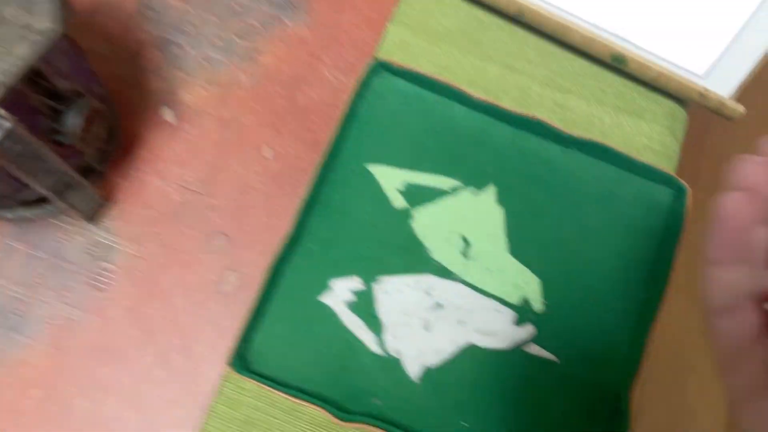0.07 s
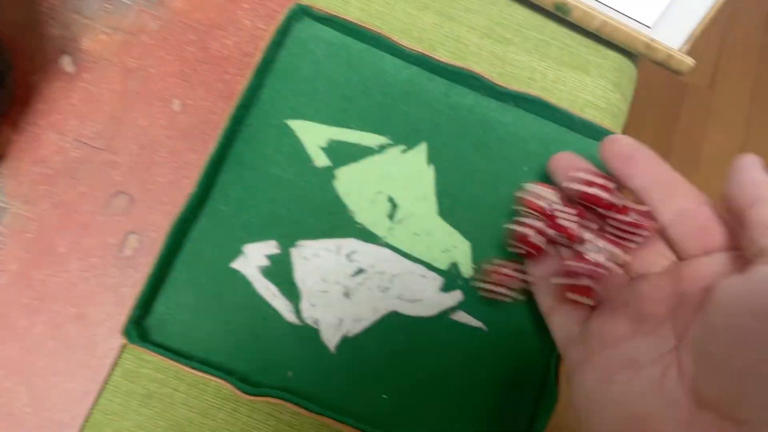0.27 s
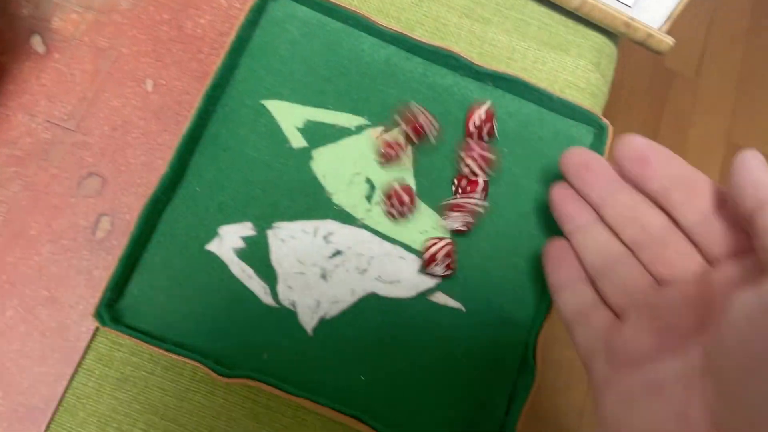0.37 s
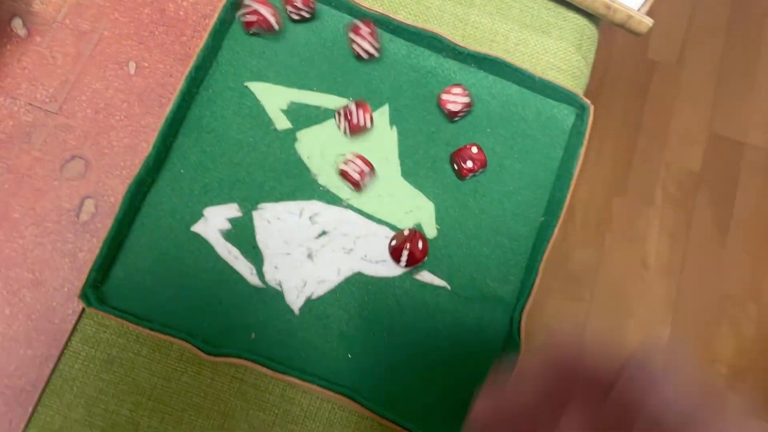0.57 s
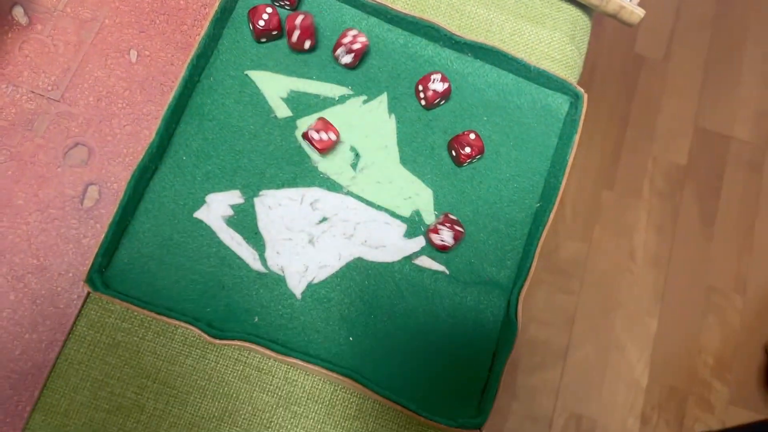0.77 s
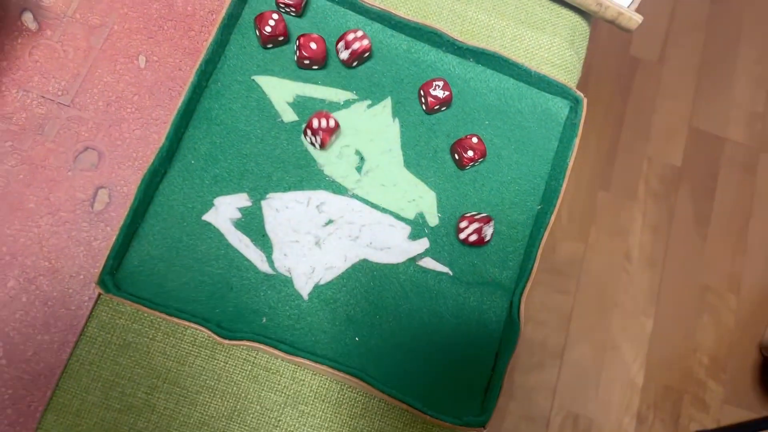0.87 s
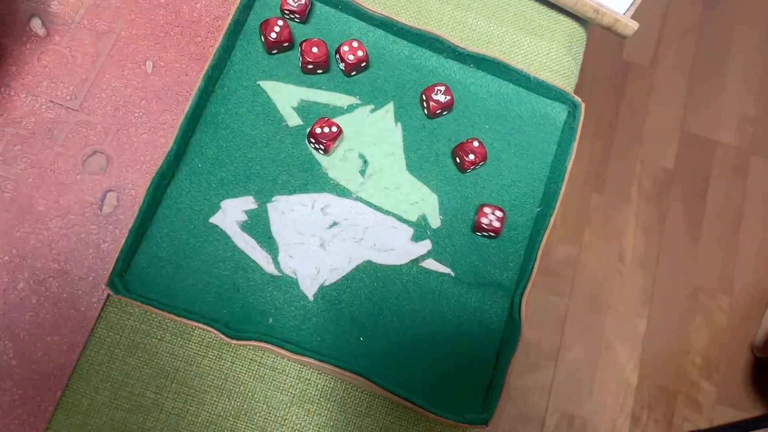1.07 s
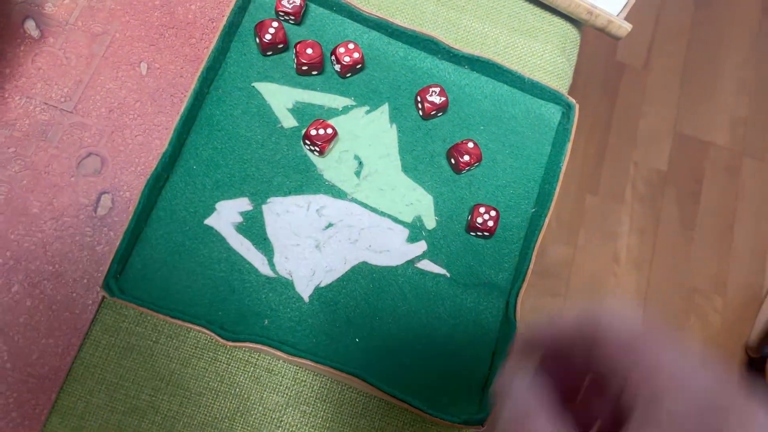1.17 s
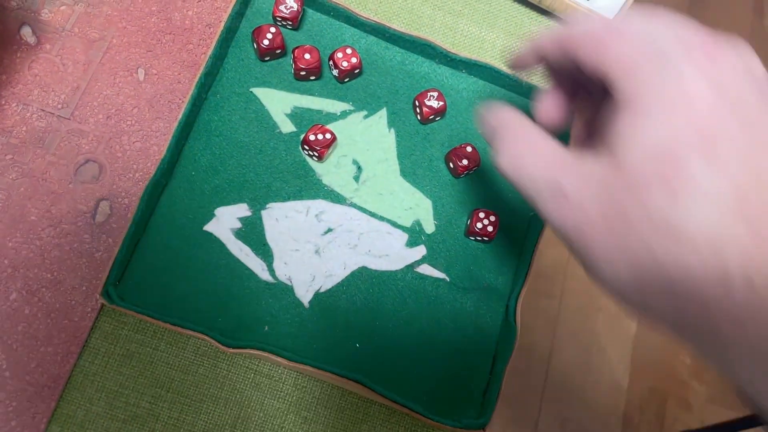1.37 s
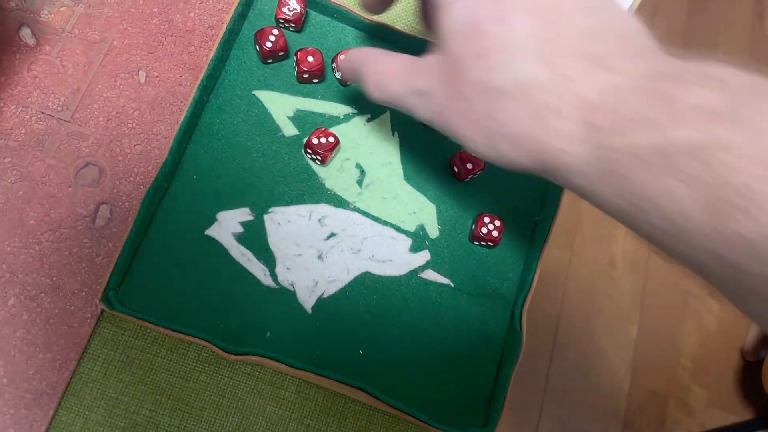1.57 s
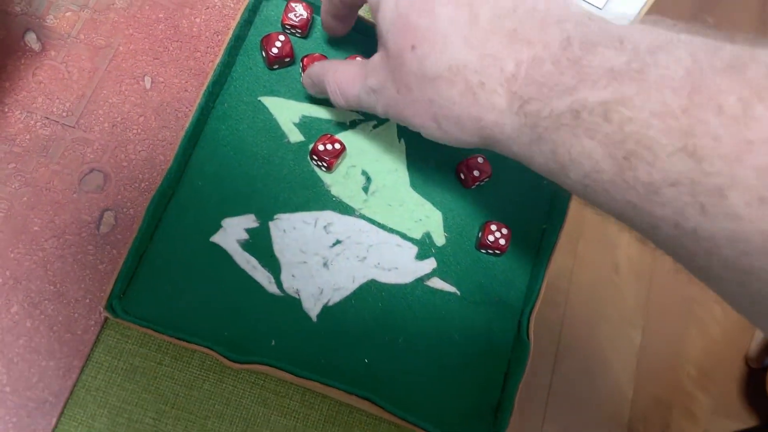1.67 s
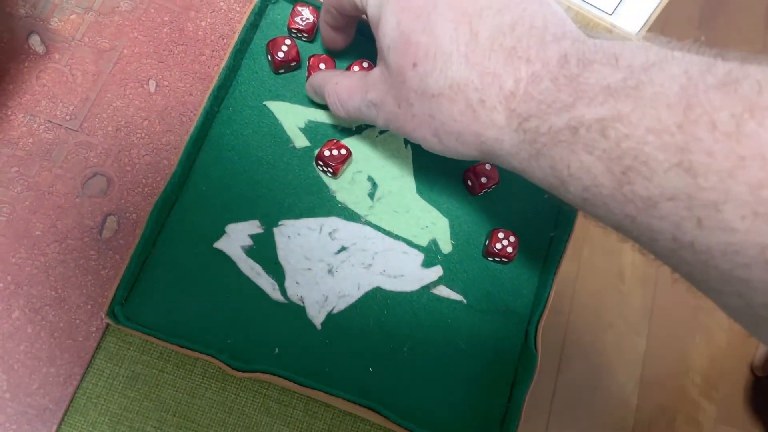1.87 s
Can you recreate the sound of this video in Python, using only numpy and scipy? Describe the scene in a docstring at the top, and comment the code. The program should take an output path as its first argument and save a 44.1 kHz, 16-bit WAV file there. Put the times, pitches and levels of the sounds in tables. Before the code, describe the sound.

A handful of dice thrown into a felt tray, followed by two faint wooden bumps.

```python
"""A sleeve rustles and dice clack in a cupped hand, each clack a bright tick over a hollow ring.
From 0.3 s they land in a felt-lined tray: it knocks, the board below booms, the dice hit each other.
They patter over the felt; the last tips flat at 0.86 s. At 1.1 s and 1.6 s something wooden is bumped
farther off, the first time after a scrape. A quiet room hum lies under it all."""
import sys
import numpy as np
from scipy import signal
from scipy.fft import rfft, irfft, next_fast_len
from scipy.io import wavfile

SR = 44100
rng = np.random.default_rng(int(sys.argv[2]) if len(sys.argv) > 2 else 0)


def dump_mix(stems):
    """Bounce the given channels to the path in sys.argv[1] as a 16-bit WAV at rate SR."""
    frames = np.atleast_2d(stems).T  # one column per channel
    limited = np.clip(frames, -1, 1)  # hard clip at full scale
    pcm = np.round(limited * 32767).astype(np.int16)
    wavfile.write(sys.argv[1], SR, pcm)


N = 83790

# modes of a die on felt: pitch_hz, level_db, t60_s
FELT_MODES = [(1250, -4, .015), (1670, 0, .025), (2150, -7, .015), (2850, -8, .015)]


def dice_clacks():
    """A touch and three fainter ones excite a bright, short ring and the hollow of the hand."""
    # clacks; a faint tail follows the first at 0.107-0.124 s: start_s, level_db, hollow_over_tick_db
    clacks = [(0.0954, -35.0, 5), (0.107, -41, 9.5), (0.1145, -51.5, 16), (0.1186, -48.5, 18),
              (0.124, -50.5, 3.5), (0.1698, -20.5, 14.5), (0.173, -33.5, 13), (0.178, -25.5, -3.5),
              (0.1813, -31.5, 6.5), (0.1844, -24.5, 10.5), (0.1886, -28, 4), (0.194, -34, 11.5),
              (0.1982, -31, 8.5), (0.201, -10.5, 21), (0.206, -11, 17), (0.2097, -10, 4), (0.2155, -26, 7),
              (0.2215, -18.5, 0.5), (0.2239, -11, 13.5), (0.2312, -24, -6.5), (0.2442, -8.5, 12.5),
              (0.2552, -15, -6), (0.2583, -29.5, -8), (0.2619, -34.5, 2), (0.2739, -34.5, -10),
              (0.3163, -22, 9), (0.3194, -17.5, -3), (0.323, -29, 0), (0.3334, -10, 0.5), (0.3384, -24, 1),
              (0.3427, -4, -24), (0.3443, 2, -16.5), (0.3537, -18.5, -15.5), (0.3585, -23.5, 2),
              (0.365, -13, -13), (0.368, -25, -0.5), (0.3871, -11, -1), (0.3945, -7, -8.5),
              (0.3967, -13.5, -15), (0.4074, -27, -13), (0.4214, -30.5, -5), (0.432, -34.5, -9.5),
              (0.5316, -16.5, -5), (0.5968, -19.5, 2.5), (0.6630, -21.5, 9.5), (0.6804, -23, -2),
              (0.6848, -14, -35), (0.7899, -40, 9), (0.8835, -56, 20.5)]
    hollow_modes = [(1800, -12), (2600, -9.5), (3600, -9.5), (4400, -3.5), (5300, -1)]  # cupped hollow: pitch_hz, level_db
    tick_modes = [(6200, 5.5), (7200, 6.5), (8300, 6), (9600, 4), (11200, -3.5), (12800, -10.5)]  # bright, short ring: pitch_hz, level_db
    chatter_s, chatter_db = 0.0033, -13
    hollow_t60_s, tick_t60_s = 0.0045, 0.0028
    throw_s, open_db_per_oct = 0.3, -0.5
    start_s, level_db, hollow_db = np.repeat(clacks, 4, axis=0).T
    lateness = (rng.random((len(clacks), 4)) * [0, 1, 1, 1]).ravel()
    start_s = start_s + chatter_s * lateness
    level_db = level_db + chatter_db * (1 + lateness) * (lateness > 0)
    tick_db = level_db - 10 * np.log10(1 + 10 ** (hollow_db / 10))  # tick and hollow share the power

    def hollow_mode_db(hz):
        """Out of the hand, the lower modes gain slightly on the top one."""
        tilt_db = open_db_per_oct * np.log2(hz / hollow_modes[-1][0])
        return tick_db + hollow_db + tilt_db * (start_s > throw_s)

    hollow = strike(start_s, hollow_mode_db, [(*mode, hollow_t60_s) for mode in hollow_modes])
    tick = strike(start_s, lambda hz: tick_db, [(*mode, tick_t60_s) for mode in tick_modes])
    return highpass(hollow + highpass(tick, 4500), 1490, order=4)


def tray_landings():
    """A landing knocks the tray, then the board below booms; the felt dulls both."""
    landings = [(0.3085, -18, -16.5, 9), (.315, -21, -43, 12.5), (0.321, -25.5, -32.5, 13.5),
                (0.328, -10, -28.5, 0), (.351, -23.5, -16, 15.5), (.357, -16, -34, 5),
                (.385, -22, -9.5, 12.5), (0.393, -25.5, -20, 11), (0.4, -22.5, -52, -23),
                (0.417, -23.5, -50.5, 5), (0.43, -22.5, -56.5, -7), (0.451, -18, -55, -8.5),
                (0.483, -33, -20, -2), (0.49, -28.5, -43, 6.5), (0.512, -36, -30.5, 18.5),
                (0.521, -30.5, -54, 10.5), (0.5639, -22, -18, 10), (0.619, -33, -52, -5),
                (0.644, -32.5, -49.5, -5), (0.673, -36, -43.5, 9), (0.695, -35, -60, -1),
                (0.727, -45, -53.5, 10), (0.749, -44.5, -51.5, 1), (0.925, -52, -71, -6),
                (.967, -58, -65, -27), (1.498, -87, -54, -2.5)]  # die on tray: start_s, boom_db, knock_db, upper_modes_db
    board_modes = [(54, -15.5, 0.2), (71.5, -0.5, 0.17), (132.6, -2.5, 0.24), (172.6, 2.5, 0.1),
                   (205.4, 2.5, 0.039), (264, 1.5, 0.036), (345, -12, 0.08), (467, -10.5, 0.037),
                   (616, -13.5, 0.055)]  # pitch_hz, level_db, t60_s
    knock_modes = [(830, -1.5, 0.0011), (1352, -9.5, 0.021), (1550, -10, 0.005)]  # pitch_hz, level_db, t60_s
    upper_from_hz, felt_hz = 230, 2100
    start_s, boom_db, knock_db, upper_db = np.transpose(landings)
    boom = strike(start_s, lambda hz: boom_db - 8 + upper_db * (hz > upper_from_hz), board_modes,
                  lag_at_250hz_s=0.0031, in_phase=True)
    knock = strike(start_s, lambda hz: knock_db + 3, knock_modes, in_phase=True)
    knock = lowpass(highpass(knock, 400), felt_hz)
    return lowpass(lowpass(boom, 900) + knock, felt_hz)


def dice_rolling():
    """Dense random touches on the felt ring the tumbling dice."""
    contour = [(.55, -47.5), (.63, -55), (.78, -54.5), (.87, -65), (.93, -100)]  # time_s, level_db
    touches_per_s = 2900
    patter = (rng.random(N) < touches_per_s / SR) * rng.standard_normal(N) + 1e-18
    roll = sum(from_db(db) * ring(patter, hz, t60_s) for hz, db, t60_s in FELT_MODES)
    return envelope(contour) * highpass(roll / roll.std(), 920)


def last_die():
    """The last die tips flat: one soft click in its upper modes."""
    top_hz = 3300
    click = clicks(start_s=[0.856], gains=from_db(-41))
    tip = sum(ring(click, hz, t60_s) for hz, _, t60_s in FELT_MODES[2:])
    return lowpass(lowpass(highpass(tip, 1800), top_hz), top_hz)


def far_bumps():
    """Distant wood scrapes, then blows crack, boom and ring on; a high hiss swells with both."""
    blows = [(1.121, -34.5, -35.5, 99, 546, -50.5, 2300), (1.1437, -51.5, -38, 176, 603, -81, 1510),
             (1.5845, -24.5, -33.5, 79.4, 376, -34.5, 9000), (1.602, -28, -29, 82.1, 404, -36, 9340),
             (1.634, -35, -35, 142.4, 442, -32, 1984), (1.684, -42, -57, 129, 460, -46.5, 2640)]  # start_s, knock_db, boom_db, boom_hz, body_hz, hiss_db, top_hz
    wood_modes = [(674, -8, 100), (956, -5, 88), (1122, -5, 162), (1390, -16, 750), (1684, -5, 295),
                  (2110, -4, 306), (3073, -10.5, 273), (3606, -6, 293), (4242, -29, 600), (5366, -19, 183)]  # pitch_hz, level_db, width_hz
    hiss_bands = [(4300, -1, 1200), (6600, 2, 600), (8040, 2.5, 1800), (9600, -7, 1000), (12450, 3, 4100),
                  (5310, 15, 110), (5740, 13, 100)]  # high hiss, two narrow singing bands: pitch_hz, level_db, width_hz
    scrape_contour = [(1.05, -60.5), (1.085, -49), (1.12, -35), (1.13, -71)]  # time_s, level_db
    correlation, body_width_hz = -0.28, 147
    noise = rng.standard_normal((2, N))
    noise[1] = correlation * noise[0] + np.sqrt(1 - correlation ** 2) * noise[1]
    scrape = envelope(scrape_contour)
    drive = lowpass(scrape * noise, 1850)
    hiss_gain = from_db(-21) * scrape
    out = 0
    for start_s, knock_db, boom_db, boom_hz, body_hz, hiss_db, top_hz in blows:
        tail = from_db(knock_db) * fade(start_s, t60_s=0.31)
        crack = from_db(knock_db + 15.5) * fade(start_s, t60_s=0.012, rise_s=0.0005)
        drive = drive + lowpass(tail * noise, top_hz) + lowpass(crack * noise, 2 * top_hz)
        body = bandpass((tail + crack) * noise[0], body_hz, body_width_hz)
        out += from_db(9) * bandpass(body, body_hz, 2 * body_width_hz)
        thump = clicks([start_s + 0.0015], gains=45) + fade(start_s, t60_s=0.28) * noise[0]
        out += from_db(boom_db + 17) * lowpass(bandpass(thump, boom_hz, width_hz=29), 400)
        hiss_gain += from_db(hiss_db) * fade(start_s, t60_s=0.23, rise_s=0.018)
    for k, (hz, db, width_hz) in enumerate(wood_modes):
        mode = bandpass(bandpass(drive, hz, width_hz), hz, width_hz)
        out = out + (-1) ** k * from_db(db + 13.5) * mode
    flat_noise = diffuse_noise(np.ones_like)
    hiss = sum(from_db(db) * bandpass(flat_noise, hz, width_hz) for hz, db, width_hz in hiss_bands)
    hiss = highpass(hiss, 1800)
    return out + hiss_gain * hiss / hiss.std()


def sleeve_rustle():
    """Cloth noise during the shake and again before the second bump."""
    contour = [(0, -59.5), (.15, -67.5), (.3, -78.5), (1.39, -90), (1.41, -65.5), (1.46, -73.5),
               (1.57, -81)]  # time_s, level_db
    spectrum = [(200, -3.5), (1200, -1.5), (2500, -1), (5000, -32.5), (9000, -24.5)]  # freq_hz, density_db
    return envelope(contour) * steady_noise(spectrum)


def room_reverb(x):
    """One hard echo and a tail that dies band by band."""
    bands = [(108, -15, 0.55), (423, -15.5, 0.2), (1496, -11.5, 0.37), (3970, -12, 0.33), (8500, -24, 0.3),
             (14480, -14, 0.15)]  # tail: freq_hz, level_db, t60_s
    echo_s, echo_db = 0.0071, -22

    def band_gain(hz):
        decay = fade(start_s=0.0022, t60_s=at_hz(bands, hz, col=2), rise_s=0.0013)
        return from_db(at_hz(bands, hz) - 25.5) * decay

    response = diffuse_noise(band_gain)
    response[:, int(echo_s * SR)] += from_db(echo_db)
    size = next_fast_len(2 * N)
    return irfft(rfft(x, size) * rfft(response, size), size)[:, :N]


def room_hum():
    """Steady broad noise and a low rumble that dips at 1.3 s; a soft low bump sounds near the end."""
    hum_spectrum = [(300, -30.5), (815, -39), (3070, -46.5), (9000, -45), (12800, -43), (15000, -52)]  # freq_hz, density_db
    rumble_spectrum = [(40, 5), (120, -1), (300, -15), (600, -50)]  # freq_hz, density_db
    rumble_contour = [(0, -62), (1.27, -61), (1.32, -77), (1.783, -57), (1.819, -61), (1.859, -80)]  # time_s, level_db
    hum = from_db(-71) * steady_noise(hum_spectrum)
    held_to_end = rumble_contour + [(N / SR, rumble_contour[-1][1])]
    return hum + envelope(held_to_end) * steady_noise(rumble_spectrum)


def strike(start_s, blow_db, modes, lag_at_250hz_s=0, in_phase=False):
    """Blows ring modes at blow_db(hz); low modes lag most; signs alternate unless in_phase."""
    spread_db = 1.5 * rng.standard_normal((len(start_s), len(modes)))
    out = 0
    for k, (hz, db, t60_s) in enumerate(modes):
        sign = 1 if in_phase else (-1) ** k
        gains = sign * from_db(blow_db(hz) + db + spread_db[:, k])
        arrival_s = start_s + lag_at_250hz_s * np.sqrt(250 / hz)
        out += ring(clicks(arrival_s, gains), hz, t60_s)
    return out


def clicks(start_s, gains):
    out = np.full(N, 1e-18)
    np.add.at(out, (np.asarray(start_s) * SR).astype(int), gains)
    return out


def ring(x, hz, t60_s):
    """A unit click starts a decaying unit sine."""
    r, w = from_db(-60 / (t60_s * SR)), 2 * np.pi * hz / SR
    return signal.lfilter([0, np.sin(w)], [1, -2 * r * np.cos(w), r * r], x)


def diffuse_noise(gain):
    """Stereo noise in half-octave bands; gain(hz) may vary in time."""
    likeness = [(100, .95), (400, 1), (1500, 0), (6000, 0.41), (8500, 0.93), (14000, 0.8)]  # left to right in diffuse sound: freq_hz, correlation
    edges_hz = 30 * 2 ** np.arange(0, 9.1, 0.5)
    out, white = 0, rng.standard_normal((2, 2, N))
    for k, (low_hz, high_hz) in enumerate(zip(edges_hz, edges_hz[1:])):
        band = signal.butter(2, [low_hz, high_hz], "band", fs=SR, output="sos")
        mid, side = signal.sosfilt(band, white[k % 2])
        hz = np.sqrt(low_hz * high_hz)
        correlation = at_hz(likeness, hz)
        stereo = np.sqrt(1 + correlation) * mid + np.sqrt(1 - correlation) * side * [[1], [-1]]
        out += gain(hz) * stereo
    return out


def steady_noise(spectrum):
    x = diffuse_noise(lambda hz: from_db(at_hz(spectrum, hz)))
    return x / x.std()


def envelope(contour):
    """Gain from time_s, level_db rows; silent outside them."""
    time_s, level_db = np.transpose(contour)
    return from_db(np.interp(np.arange(N) / SR, time_s, level_db, -200, -200))


def fade(start_s, t60_s, rise_s=0.0003):
    """Rise, then fall ever faster; t60_s sets the initial slope."""
    steepen_db_per_s2 = 246.5
    t = np.maximum(np.arange(N) / SR - start_s, 0)
    return (1 - np.exp(-t / rise_s)) * from_db(-60 * t / t60_s - steepen_db_per_s2 * t * t)


def from_db(db):
    return 10 ** (np.asarray(db) / 20)


def at_hz(rows, hz, col=1):
    columns = np.transpose(rows)
    return np.interp(np.log(hz), np.log(columns[0]), columns[col])


def bandpass(x, hz, width_hz):
    r, w = np.exp(-np.pi * width_hz / SR), 2 * np.pi * hz / SR
    gain = (1 - r * r) / 2
    return signal.lfilter([gain, 0, -gain], [1, -2 * r * np.cos(w), r * r], x)


def lowpass(x, hz, order=2):
    return signal.sosfilt(signal.butter(order, min(hz, 18000), fs=SR, output="sos"), x)


def highpass(x, hz, order=2):
    return signal.sosfilt(signal.butter(order, hz, "high", fs=SR, output="sos"), x)


def scene():
    near = dice_clacks() + tray_landings() + dice_rolling() + last_die()
    return near + room_reverb(near) + far_bumps() + sleeve_rustle() + room_hum()


def record(dry):
    """Two microphone ports differ in phase and level; band limits, clipping, a steep top cut."""
    port_phase = [(300, 0), (2000, -.1), (3500, -.8), (5500, 1.8), (7000, 2.2), (8300, 3.05), (9650, 3.5),
                  (11000, 4.3), (12400, 5.4), (13800, 6.2)]  # right over left: freq_hz, phase_rad
    balance = [(60, 2), (300, 4), (1300, 2), (3000, 1.5), (7000, 3.5), (9000, 1.5)]  # left over right: freq_hz, level_db
    low_cut_hz, top_hz, stop_hz = 50, 14200, 15200
    size = next_fast_len(N + 2048)
    hz = np.maximum(np.fft.rfftfreq(size, 1 / SR), 1)
    left = from_db(at_hz(balance, hz) / 2) * np.exp(-0.5j * at_hz(port_phase, hz))
    x = irfft(rfft(dry, size) * [left, 1 / left], size)[:, :N]
    x = lowpass(highpass(x, low_cut_hz, order=4), top_hz, order=4)
    return signal.sosfilt(signal.cheby2(12, 60, stop_hz, fs=SR, output="sos"), np.clip(x, -1, 1))


dry = scene()
out = record(dry)
dump_mix(out)
```